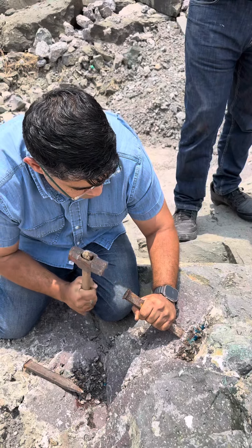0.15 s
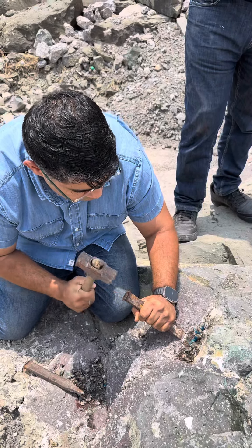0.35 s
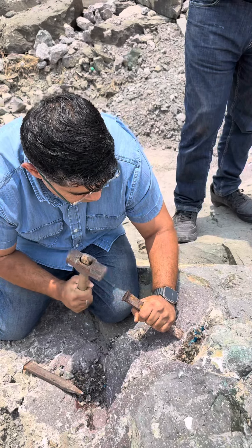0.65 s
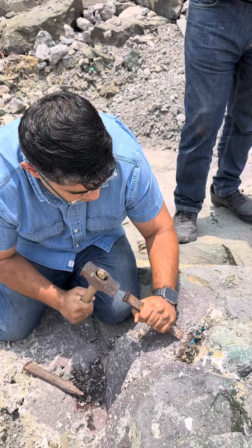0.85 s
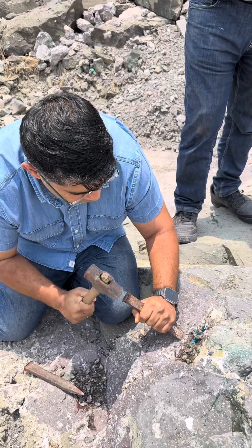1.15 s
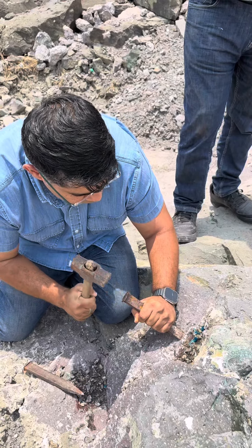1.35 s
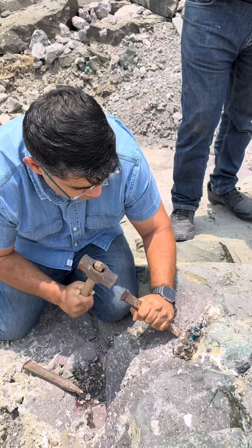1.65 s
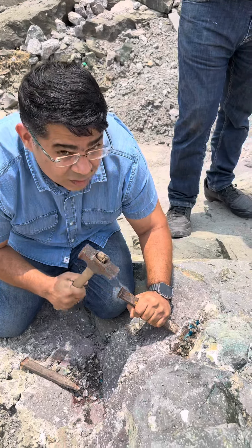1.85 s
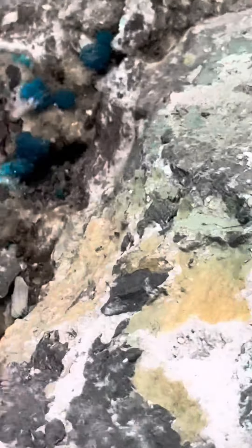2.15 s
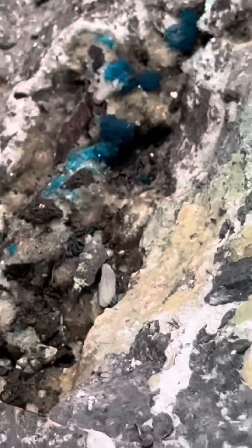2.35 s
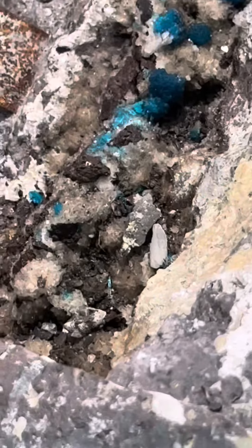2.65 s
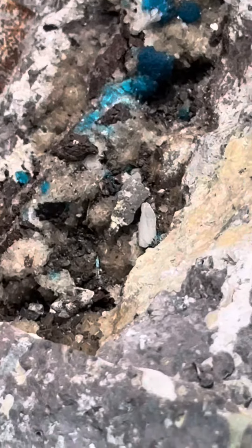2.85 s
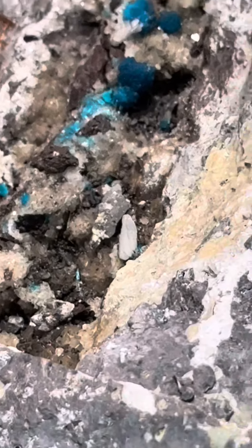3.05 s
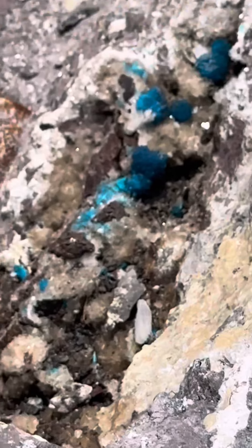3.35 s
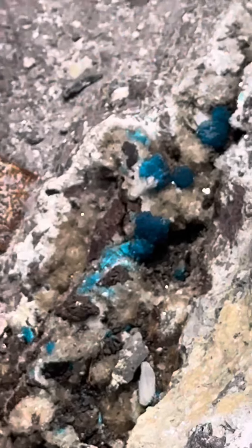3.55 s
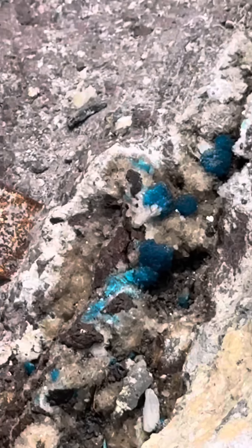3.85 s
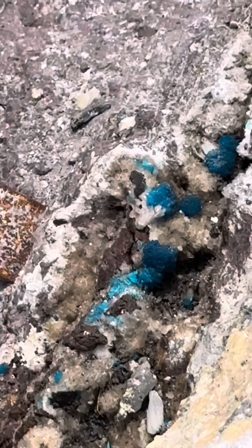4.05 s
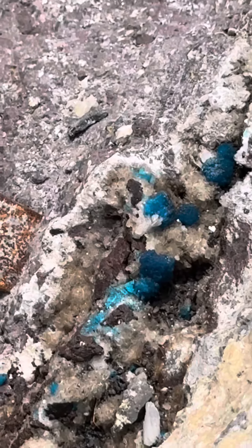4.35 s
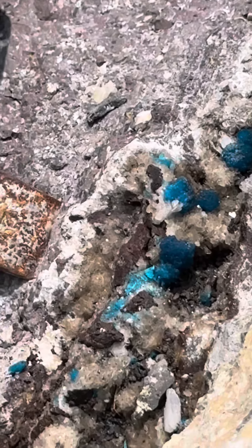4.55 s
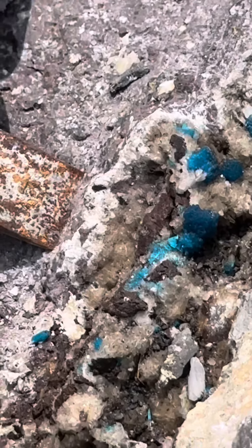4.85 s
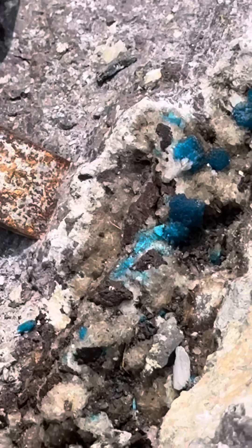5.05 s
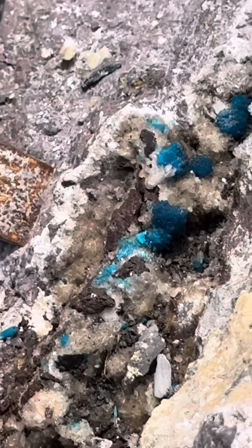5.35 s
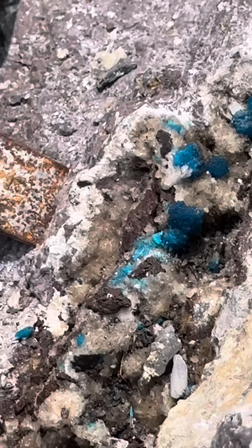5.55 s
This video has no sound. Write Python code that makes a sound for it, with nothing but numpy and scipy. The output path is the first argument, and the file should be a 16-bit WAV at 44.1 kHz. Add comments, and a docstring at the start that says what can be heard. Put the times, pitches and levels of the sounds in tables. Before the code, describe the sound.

A hammer taps a steel chisel into rock in a steady run of sharp metallic clinks outdoors, first at a distance, then close up.

```python
"""Hammer and chisel on a rock outcrop

A hand hammer taps a steel chisel: six blows from afar, the rest with the microphone close to the tip.
Each blow is a shaped click, decaying steel and rock modes, and noise for the rubble and a far slope.
Two light rebounds follow near the end. Boots in gravel, a short scrape, wind and still air are shaped noise;
falling chips are short tones with a puff of grit."""
import sys
import numpy as np
from scipy import signal
from scipy.fft import irfft
from scipy.io import wavfile
from scipy.ndimage import uniform_filter1d

SR = 44100
rng = np.random.default_rng(int(sys.argv[2]) if len(sys.argv) > 2 else 0)


def unload_wav(signal):
    """Save mono or channel-first audio to the path in sys.argv[1] as 16-bit WAV at rate SR, clipped to [-1, 1]."""
    wavfile.write(
        sys.argv[1],
        SR,
        np.round(np.clip(np.atleast_2d(signal).T, -1, 1) * 32767).astype(np.int16),
    )


N = 251801  # length in samples
MOVE_S = 1.9  # blows after this are heard from close up

# Colour of loose gravel and grit. Each row: frequency in Hz, relative level in dB per Hz.
GRAVEL_COLOUR = [(53, -34.5), (90, 6.5), (316, -11), (457, -28), (769, -10.5), (1040, -23.5), (2320, -17.5),
                 (4000, -30), (6300, -28), (7020, -35.5), (7820, -30.5), (9720, -34.5), (11100, -60),
                 (13200, -38), (16000, -36)]


def amp(db):
    """Turn decibels into an amplitude factor."""
    return 10 ** (np.asarray(db) / 20)


def read(points, hz):
    """Read a table at the given frequencies, along a logarithmic frequency axis."""
    f, value = np.transpose(points)
    return np.interp(np.log(hz + 1), np.log(f + 1), value)


def follow(rows):
    """Draw straight lines through (second, level) rows over the whole scene."""
    return np.interp(np.arange(N) / SR, *np.transpose(rows))


def add(mix, s, sound):
    """Mix in a sound at a second, cut off at both ends of the scene."""
    at = round(s * SR)
    part = mix[:, max(at, 0):][:, :sound.shape[1] + min(at, 0)]
    part += sound[:, max(-at, 0):][:, :part.shape[1]]


def noise(spectrum, same, patchy_db, size, length=N, t60=((1, 1e4), (2, 1e4))):
    """Two-channel noise of rms 1 from random short spectra, with drifting patches and a decay by band."""
    hop, hz = size // 4, np.fft.rfftfreq(size, 1 / SR)
    a, b, c, d, patches = rng.standard_normal((length // hop + 5, len(hz), 5)).T
    patches = uniform_filter1d(patches, size=5, axis=0)
    patches = uniform_filter1d(patches, size=7, axis=1)
    same = np.clip(same, -1, 1)  # correlation between the channels
    left = a + 1j * b
    right = same * left + np.sqrt(1 - same ** 2) * (c + 1j * d)
    t = np.arange(left.shape[1]) * hop / SR
    colour_db = read(spectrum, hz)[:, None] + patchy_db * patches / patches.std()
    decay_db = -60 * t / read(t60, hz)[:, None]
    spectra = np.array([left, right]) * amp(colour_db + decay_db)
    out = signal.istft(spectra, nperseg=size, noverlap=size - hop)[1][:, :length]
    return out / np.sqrt(np.mean(out ** 2))


def ring(t, hz, db, t60, turns):
    """A decaying sine mode that swells over some turns of its own cycle."""
    t = np.maximum(t, 0)
    swell = (1 - np.exp(-t * hz / turns)) ** 3
    return amp(db - 60 * t / t60) * swell * np.sin(2 * np.pi * hz * t)


def air():
    """A faint, wide and steady hiss of the open place."""
    # Each row: frequency in Hz, relative level in dB per Hz.
    air_colour = [(350, -28), (600, -1), (1330, -7), (3070, -4.5), (4260, -13), (6120, -5), (7510, -18),
                  (9000, -15), (11700, -46.5), (19800, -120)]
    return amp(-79) * noise(air_colour, 0.2, 2.3, size=512)


def wind():
    """A low rumble that follows the breeze and wavers in small gusts."""
    # Strength of the breeze. Each row: time in seconds, level in dB.
    breeze = [(0, -57), (.54, -59), (.71, -52), (.9, -59), (1.25, -61), (1.65, -54), (2.15, -58.5),
              (3.86, -62), (4.5, -64), (5.4, -67), (5.71, -66.5)]
    # Colour of the rumble. Each row: frequency in Hz, relative level in dB per Hz.
    rumble_colour = [(12, -37.5), (20, -15.5), (59, 10.5), (109, -6.5), (176, -5.5), (340, -14.5),
                     (396, -19), (499, -20), (1170, -31), (2000, -30.5), (2600, -57), (4400, -120)]
    gust_db, gust_samples = 2.5, round(0.044 * SR)
    gusts = uniform_filter1d(rng.standard_normal(N), gust_samples)
    gusts = uniform_filter1d(gusts, gust_samples)
    level_db = follow(breeze) + gust_db * gusts / gusts.std()
    return amp(level_db) * noise(rumble_colour, .9, 0.73, size=2048)


def shuffle():
    """Gravel under boots: noise broken into clumps of grains; each push builds up, then settles."""
    # Each row: loudest moment in seconds, level there in dB, build-up over the last 10 dB in seconds,
    # 0 if the boot then lifts or 1 if it rests.
    pushes = [(.034, -56, 0.022, 0), (.094, -47, 0.036, 1), (.51, -42, 0.027, 0), (.622, -46.5, 0.11, 0),
              (0.661, -57, 0.018, 0), (.697, -46.5, 0.038, 1)]
    settle_db_per_s = [-500, -170]  # fast when the boot lifts, slowly when it rests
    t = np.arange(N) / SR
    clumps = uniform_filter1d(rng.standard_normal(N), size=160)
    grains = amp(2.6 * clumps / clumps.std()) * noise(GRAVEL_COLOUR, .6, 3, size=256)
    pressure = np.zeros(N)
    for s, db, rise_s, rests in pushes:
        slope_db = np.where(t < s, 10 * (t - s) / rise_s, settle_db_per_s[round(rests)] * (t - s))
        pressure += amp(db + slope_db)
    return grains * pressure


def scrape():
    """The dragged chisel tip: noise in one narrow resonance that arches with the speed of the drag."""
    # One drag: start in seconds, end in seconds, top pitch in Hz.
    drag = (1.9, 2.02, 3030)
    start, end, hz = drag
    sag_hz, edge_s, width_hz = 149, 0.0055, 260
    t = np.arange(N) / SR
    pitch = hz - sag_hz * np.clip((2 * t - start - end) / (end - start), -1, 1) ** 2
    turn = np.exp(2j * np.pi * np.cumsum(pitch) / SR)
    r = np.exp(-np.pi * width_hz / SR)
    # a low-pass in the frame that turns with the pitch makes a gliding resonance
    tone = (turn * signal.lfilter([1 - r], [1, -r], rng.standard_normal(N) / turn)).real
    fade = np.clip(np.minimum(t - start, end - t) / edge_s + 1, 0, 1) ** 2
    return amp(-67.5) * fade * tone / tone.std()


def chip(db, hz):
    """A falling chip: a short tick with three dull, unrelated pitches and a puff of grit."""
    tick_t60_s, grit_t60_s, grit_db = .45 * 0.023, 1.2 * 0.023, -5
    t = np.arange(2600) / SR
    tick = sum(ring(t, hz * ratio, part_db, tick_t60_s, turns=0.97)
               for ratio, part_db in [(1, 6), (1.8, -3.5), (3.1, -17.5)])
    grit = noise(GRAVEL_COLOUR, 0.32, 1.3, size=128, length=len(t))
    grit *= amp(grit_db - 60 * t / grit_t60_s) * np.clip(t / 0.0014, 0, 1)
    return amp(db) * (tick + grit)


def echo(s, near, t):
    """A rough slope thirty metres off returns a smeared, dull echo."""
    # Each row: frequency in Hz, relative level in dB per Hz.
    slope_colour = [(410, -40), (700, -8.5), (967, -10), (1590, -26), (1780, -14), (3560, -1.5),
                    (4370, -18.5), (6040, -8), (8150, -35), (10000, -28.5), (11000, -55.5), (14300, -61.5),
                    (22000, -120)]
    smear = 1 / (1 + np.exp(-(t - .172) / 0.0079)) / (1 + np.exp((t - .25) / 0.02))
    # the echo weakens by 2 dB per second as the microphone sinks into the hollow
    level_db = [-63, -66][near] - 2 * max(s - MOVE_S, 0)
    return amp(level_db) * smear * noise(slope_colour, 0.11, 3.2, size=256, length=len(t))


def rubble_scatter(near, t, crack_db):
    """The crack scattered off the rubble: a noise tail that decays by band, with a brief dip in level."""
    # Colour from afar and close up. Each row: frequency in Hz, relative level in dB per Hz.
    far_colour = [(240, -43.5), (400, -5.5), (697, -0.5), (994, -11.5), (1760, -17), (3690, -5),
                  (4580, -20), (5780, -13.5), (10500, -22), (12300, -40.5), (13300, -34), (14100, -24.5),
                  (15000, -24), (16000, -65)]
    near_colour = [(240, -32), (400, 3.5), (719, -20), (949, -14), (1290, -25.5), (2670, -14), (3020, -12),
                   (4730, -24.5), (5520, -20.5), (7510, -24.5), (10900, -29), (11600, -33), (14100, -15),
                   (15000, -19), (16000, -47.5)]
    # Decay. Each row: frequency in Hz, time to fall 60 dB in seconds.
    decay = [(500, 0.11), (3000, .11), (6000, 0.13), (14000, 0.042)]
    scatter = noise([far_colour, near_colour][near], [.6, .85][near], 3.8, size=256, length=len(t), t60=decay)
    # the noise tail starts with the crack, dips for some ten milliseconds, then swells again
    level = 5.1 * np.exp(-t / 0.0041) + 1 / (1 + np.exp(-(t - .011) / 0.0012))
    level *= np.clip(t / 0.0033, 0, 1)
    return amp(crack_db + [-38, -48][near]) * scatter * level


def rock_thud(near, t, knock_db):
    """Short modes of the rock; bending waves in the slab are slower the lower they are."""
    # Each row: frequency in Hz, relative level in dB from afar, the same close up,
    # time to fall 60 dB in seconds, left over right in dB.
    rock_modes = [(136, 3, 4, 0.076, 0), (61.6, -15.5, -19, 0.02, -1.5), (111, -18, -17.5, 0.016, 0.5),
                  (192.4, -7.5, -11.5, .035, 1), (235.6, -5, -7.5, .05, -3.5), (343.8, -4.5, -11, .045, -1),
                  (391, -4.5, -11, 0.033, 1), (522.6, -9.5, -15.5, .028, -3.5), (896, 1.5, -3, 0.013, -0.5),
                  (1030, -1.5, -3, 0.007, -3.5)]
    thud_db, knock_hz = [-6, -11][near], 170  # modes above knock_hz change with the bite of the tip
    sides = np.array([[1], [-1]])
    out = np.zeros((2, len(t)))
    for hz, *db, t60, pan_db in rock_modes:
        lag = 0.0049 * np.minimum(135 / hz, 1.1) ** 2.2
        level = amp(thud_db + knock_db * (hz > knock_hz) + sides * pan_db / 2)
        out += level * ring(t - lag, hz, db[near], t60, turns=0.83)
    return out


def steel_ring(near, t, chisel_db, shank_db):
    """Lasting modes of chisel, hammer head and thin shank, each wavering randomly in level."""
    # Each row: frequency in Hz, relative level in dB from afar, the same close up,
    # time to fall 60 dB in seconds, part (0 chisel, 1 head, 2 shank).
    steel_modes = [(3558, -30.5, -48, 0.08, 1), (6460, -32.5, -47.5, .07, 1),
                   (9700, -36.5, -38.5, 0.041, 0), (10920, -64, -53, 0.17, 2), (13900, -44, -51, .06, 1),
                   (13400, -38.5, -54, 0.07, 1), (14700, -31.5, -35.5, .07, 0)]
    part_db = [chisel_db, [-3.5, -0.5][near], shank_db]  # the head is the same for every blow
    waver = [50, 130, 70]  # multiplies smoothed noise of about 0.08 rms, in dB
    out = np.zeros((2, len(t)))
    for hz, *db, t60, part in steel_modes:
        spot_db = 3 * rng.standard_normal()  # where the hammer lands favours some modes
        # each ring wavers randomly in level, which roughens its tone
        roughness = uniform_filter1d(rng.standard_normal((2, len(t))), size=150)
        level = amp(part_db[part] + spot_db + waver[part] * roughness)
        out += level * ring(t, hz, db[near], t60, turns=84.0)
    return out


def crack(near):
    """Steel on steel: a causal click, treble first, with random bounces off stones too small to turn the bass;
    a time shift between the microphone ports puts a quarter-turned copy to the side."""
    # Colour in the middle, then at the side, each from afar and close up.
    # Each row: frequency in Hz, relative level in dB per Hz.
    far_middle = [(760, -43), (1300, -15), (1650, -12.5), (2180, -21.5), (3310, 7.5), (4480, -28.5),
                  (5800, -4.5), (7040, -20), (9930, -3.5), (11200, -33), (11900, -30.5), (13300, -1.5),
                  (14300, -6.5), (15300, -9), (17000, -36.5)]
    near_middle = [(1120, -23), (1900, -11), (2470, 0), (2940, 2), (3520, -3), (4140, -19), (5390, -5.5),
                   (7010, -15), (7540, -29), (8110, -14.5), (9040, -19.5), (10400, -22), (11300, -46.5),
                   (14900, -6.5), (16600, -29.5)]
    far_side = [(180, -53.5), (300, -11.5), (1200, -12), (2400, -15), (3420, -1), (4550, -23), (5870, -8.5),
                (8220, -20.5), (10800, -9.5), (12100, -21.5), (13600, -22), (15900, -33), (17000, -55)]
    near_side = [(180, -65), (300, -28.5), (1080, -9.5), (1890, -11), (2980, -1.5), (4180, -19),
                 (7310, -10.5), (8360, -18), (10400, -12), (15600, -23.5), (17000, -35.5)]
    middle_db, side_db, bounce = [5.5, 8.5][near], [6.5, -.5][near], [.3, .12][near]
    hz = np.fft.rfftfreq(2048, 1 / SR)
    log_gain = np.log(amp(np.maximum(read([far_middle, near_middle][near], hz), -70)))
    side_gain = amp(read([far_side, near_side][near], hz))
    # minimum phase for the colour, then each pitch arrives some turns late
    phase = -signal.hilbert(np.r_[log_gain, log_gain[-2:0:-1]]).imag[:len(hz)]
    phase += 2 * np.pi * 1.635 * np.log(SR / 2 / np.maximum(hz, 200))
    delay_s = rng.exponential(.0011, size=12)
    size = rng.uniform(-1.7, 1, size=12)
    bounces = (size * np.exp(-2j * np.pi * hz[:, None] * delay_s)).sum(1)
    paths = 1 + bounce * np.clip(hz / 2500, 0, 1) ** 2 * bounces
    turned = np.exp(1j * phase - 2j * np.pi * hz * 0.00067) * paths  # 0.67 ms of room ahead of the click
    middle, side = irfft([turned * np.exp(log_gain), 1j * turned * side_gain])[:, :1500]
    middle = amp(middle_db) * middle / np.linalg.norm(middle)
    side = amp(side_db) * side / np.linalg.norm(side)
    return np.array([middle + side, middle - side])


def blow(s, crack_db, chisel_db, shank_db, knock_db, weight_db=0):
    """One blow: crack, ring in the steel, thud in the rock, scatter off the rubble and far echo."""
    near = int(s > MOVE_S)
    t = np.arange(SR // 3) / SR
    out = steel_ring(near, t, chisel_db, shank_db)
    out += rock_thud(near, t, knock_db)
    out += rubble_scatter(near, t, crack_db)
    out += echo(s, near, t)
    balance_db = np.array([[1], [-1]]) * [-.3, .1][near]
    add(out, 0, crack(near) * amp(crack_db + balance_db))
    return amp(weight_db) * out


def rebound(s, weight_db):
    """The hammer drops back lightly: a light contact lasts longer and is dull above 7600 Hz."""
    tap = blow(s, crack_db=0, chisel_db=-16, shank_db=-16, knock_db=9.5, weight_db=weight_db)
    return signal.lfilter(*signal.butter(2, 7600, fs=SR), tap)


def scene():
    """Lay the blows, rebounds and chips over the background of the outcrop."""
    # Each row: start in seconds, then relative levels in dB of the crack, the chisel ring,
    # the long thin shank ring and the knock in the rock.
    blows = [(0.2404, -2, 3, -11.5, 4), (0.5225, -3, 6.5, -11, 3.5), (0.819, -2, 1, -5, 3),
             (1.1091, -1.5, 2.5, -3.5, 0.6), (1.431, -3, 1.5, 6.5, -3), (1.724, -4, 1.1, -4, 0.4),
             (2.1203, -1.45, 2.5, -7.5, 1.7), (2.3671, 0.7, 6.5, -3.5, 3.6), (2.635, 0, 5.5, -1, 3.6),
             (2.9129, -0.45, 4, -4, 0.1), (3.19, -0.5, 1, -4, 2.4), (3.4464, 0, -4, -12, 2.8),
             (3.6885, -0.94, 1, 0, 2.5), (3.928, 1.5, -1, -7, 3.4), (4.1846, 0, 8, -0.6, 1),
             (4.4412, -0.5, 1.5, -4.5, 1.5), (4.7184, 0, 5.6, -2.5, 1.7), (4.9963, -0.4, 4.5, 3.5, 3),
             (5.284, 0, 7.5, -2.5, 1.9), (5.5968, 1.5, 0, -16, 2.9)]
    # A blow just before the start, of which only the tail is heard: the same columns, then weight in dB.
    earlier_blow = (-.034, 0, 0, -8, 0, -5)
    # Each row: start in seconds, weight in dB.
    rebounds = [(5.3483, -21.5), (5.664, -22.5)]
    # Falling chips and grit. Each row: start in seconds, relative level in dB, lowest pitch in Hz.
    chips = [(0.083, -43, 750), (0.367, -46.5, 786), (0.499, -40, 865), (0.61, -33, 760), (0.688, -31, 750),
             (1.989, -43.5, 740), (2.017, -52, 1470), (2.077, -47, 2300), (2.248, -50.5, 1810),
             (2.281, -52, 703), (2.292, -49.5, 1760), (2.304, -49, 1690), (3.819, -70, 980)]
    mix = air() + wind() + shuffle() + scrape()
    for s, *row in chips:
        add(mix, s, chip(*row))
    for s, weight_db in rebounds:
        add(mix, s, rebound(s, weight_db))
    for row in [earlier_blow] + blows:
        add(mix, row[0], blow(*row))
    return mix


def record(dry):
    """The microphone drops the deepest bass and overloads softly on peaks; then the band limit."""
    thin = signal.sosfilt(signal.butter(2, 42., "highpass", fs=SR, output="sos"), dry)
    soft = 1.215 * np.tanh(thin / 1.045)
    band_limit = signal.firwin(255, 16900, window=("kaiser", 9), fs=SR)
    return signal.oaconvolve(soft, band_limit[None], "same")


dry = scene()
out = record(dry)
unload_wav(out)
```